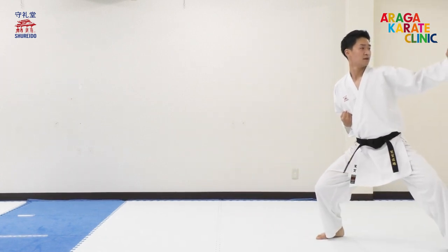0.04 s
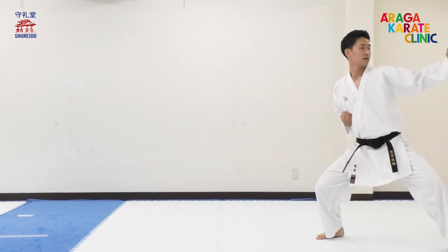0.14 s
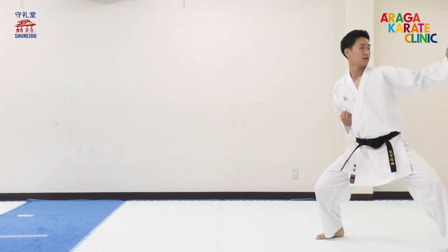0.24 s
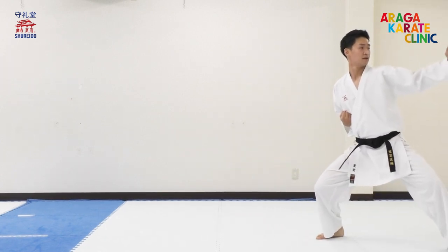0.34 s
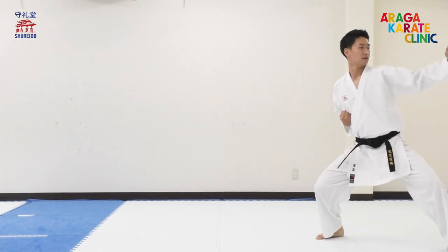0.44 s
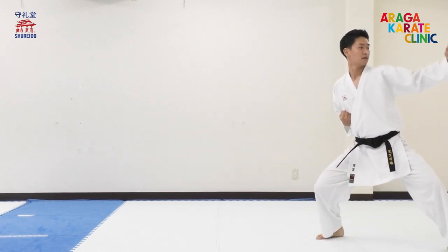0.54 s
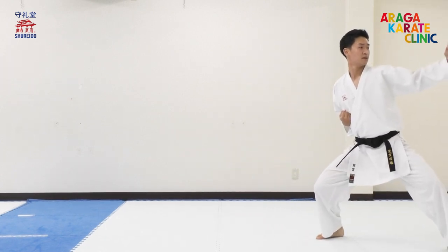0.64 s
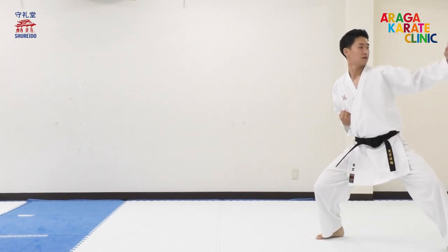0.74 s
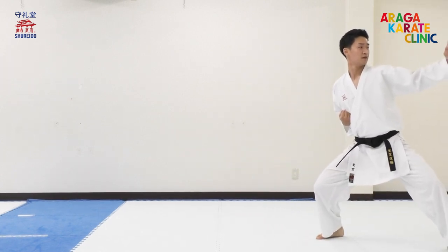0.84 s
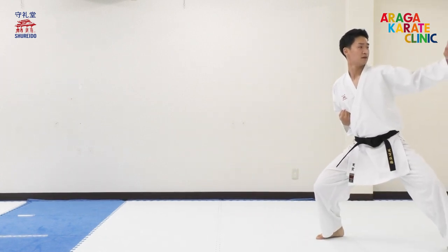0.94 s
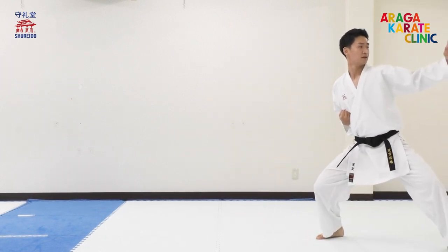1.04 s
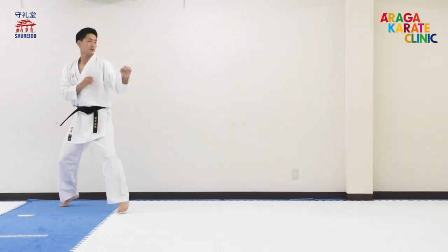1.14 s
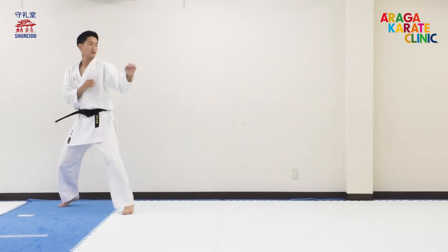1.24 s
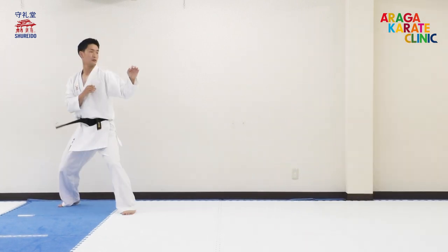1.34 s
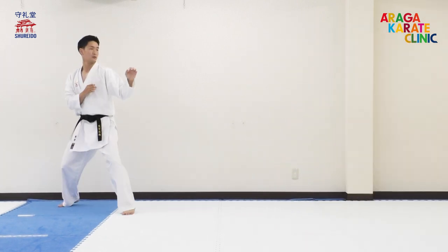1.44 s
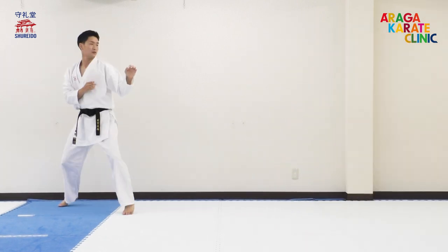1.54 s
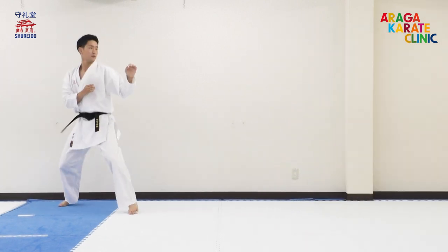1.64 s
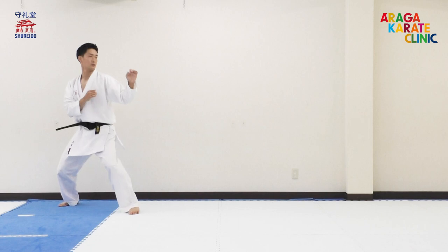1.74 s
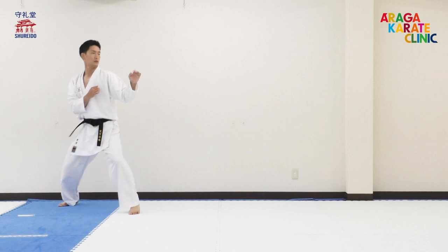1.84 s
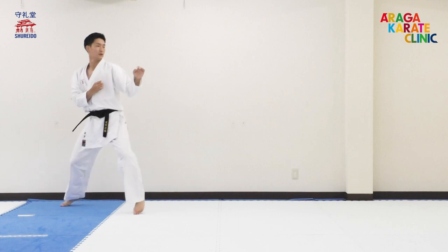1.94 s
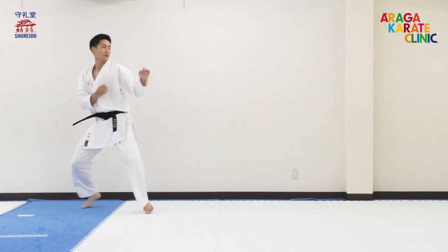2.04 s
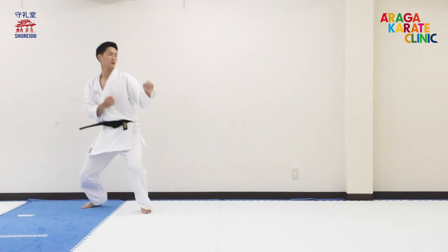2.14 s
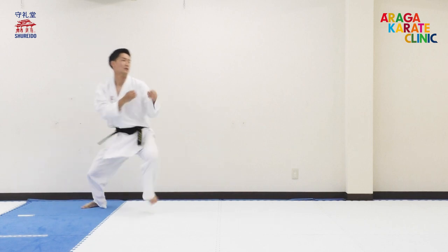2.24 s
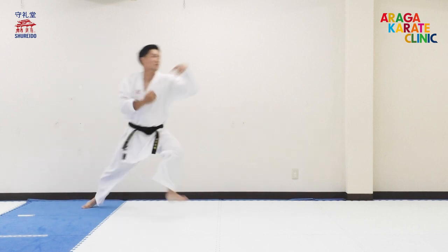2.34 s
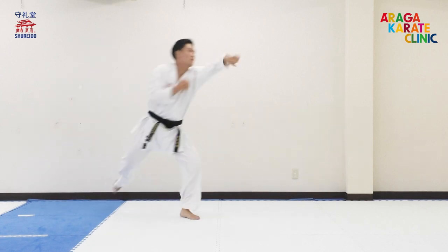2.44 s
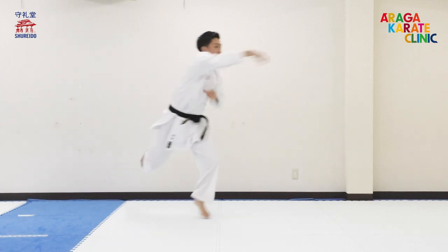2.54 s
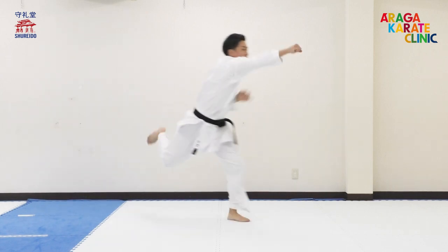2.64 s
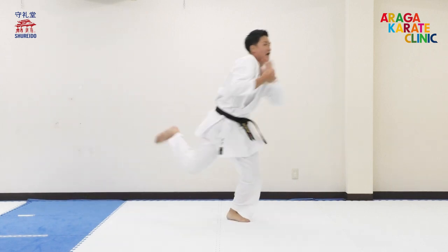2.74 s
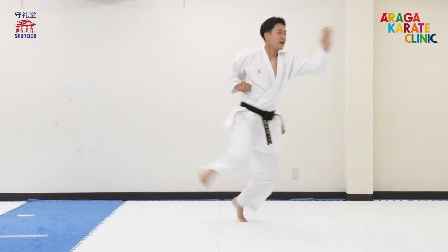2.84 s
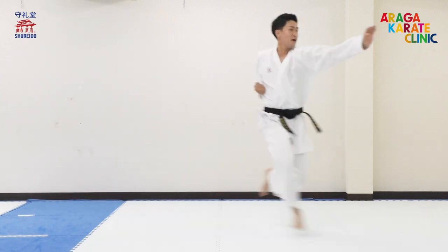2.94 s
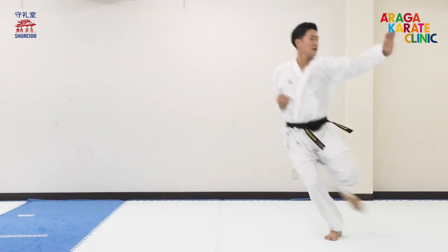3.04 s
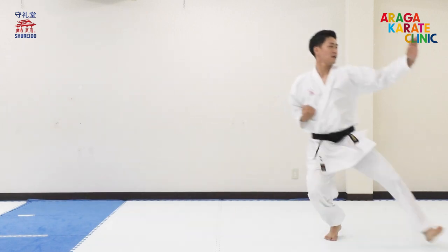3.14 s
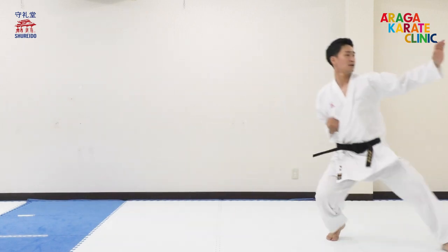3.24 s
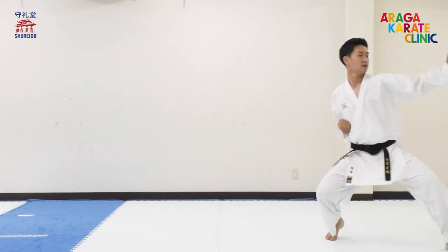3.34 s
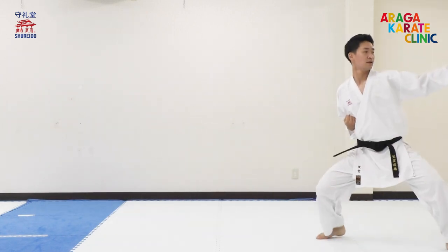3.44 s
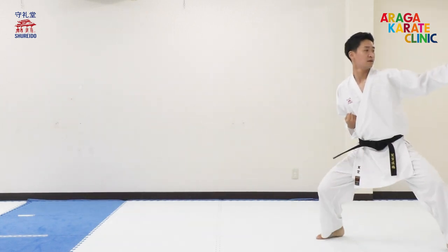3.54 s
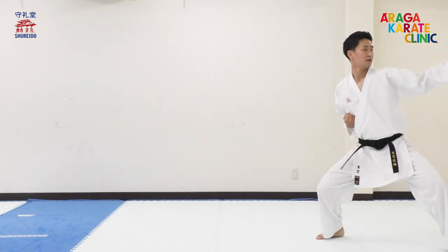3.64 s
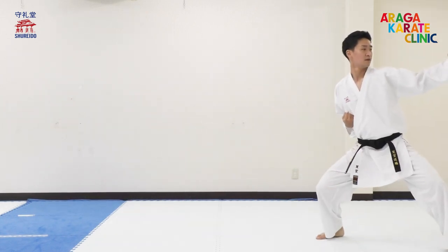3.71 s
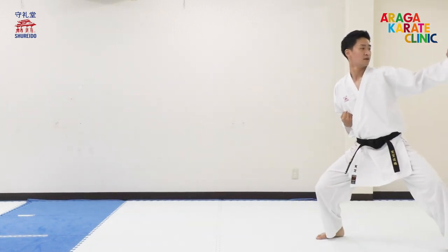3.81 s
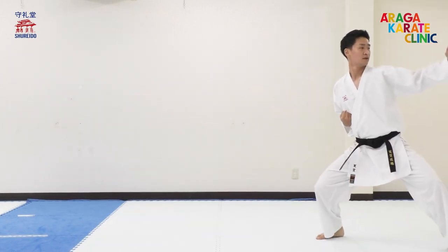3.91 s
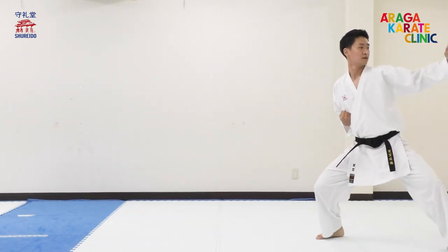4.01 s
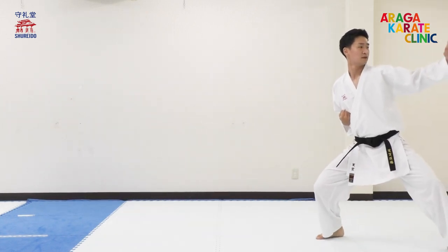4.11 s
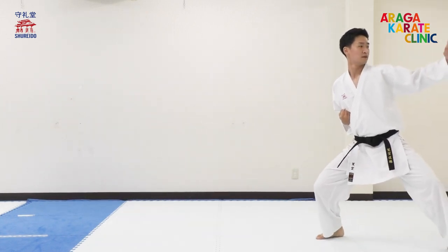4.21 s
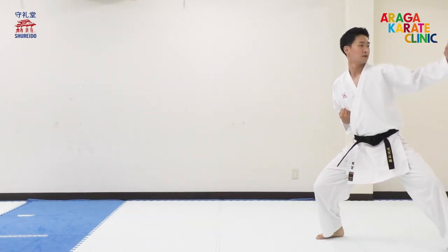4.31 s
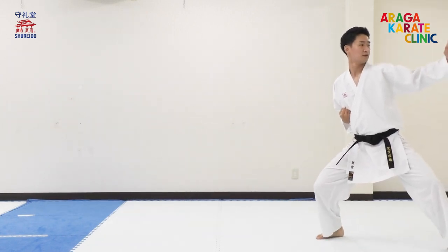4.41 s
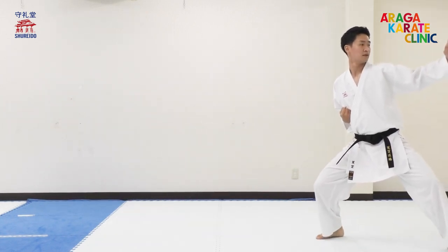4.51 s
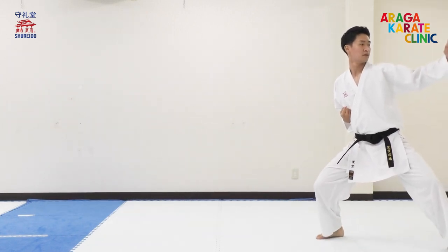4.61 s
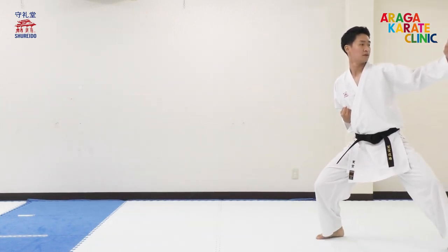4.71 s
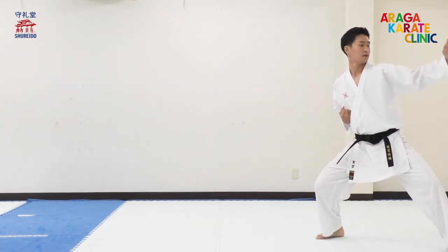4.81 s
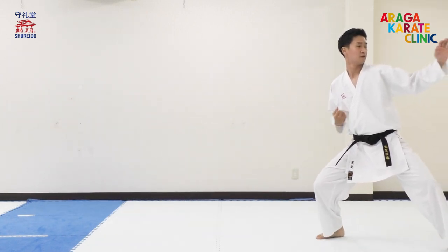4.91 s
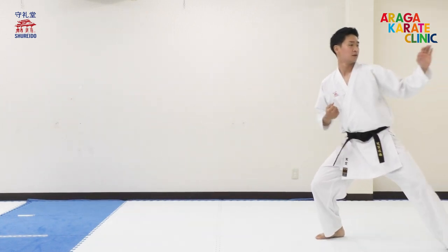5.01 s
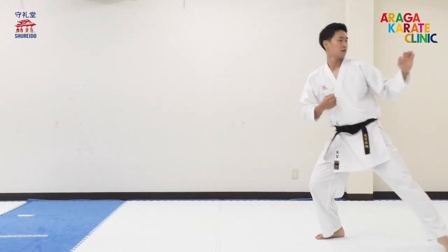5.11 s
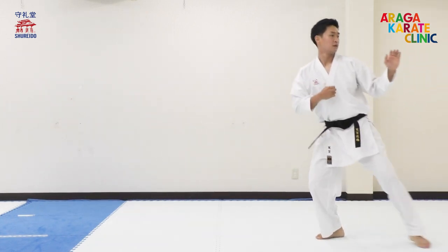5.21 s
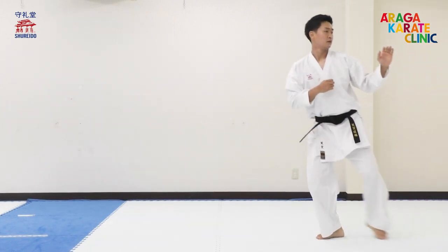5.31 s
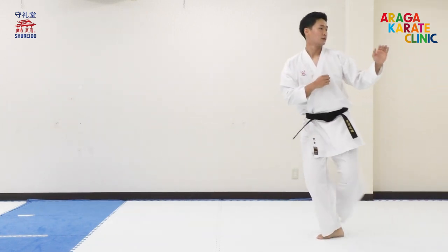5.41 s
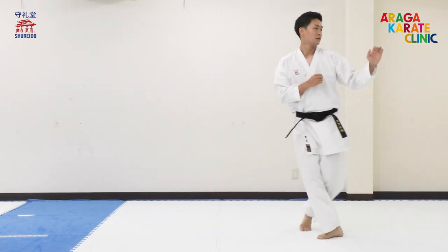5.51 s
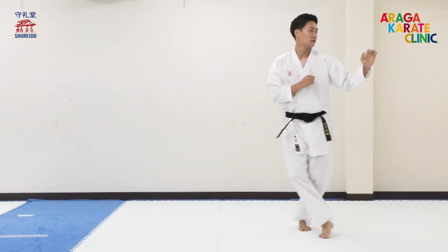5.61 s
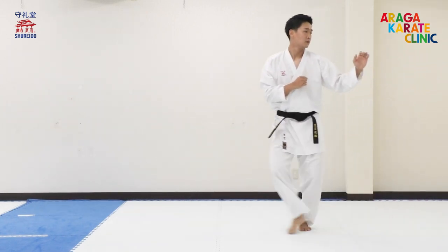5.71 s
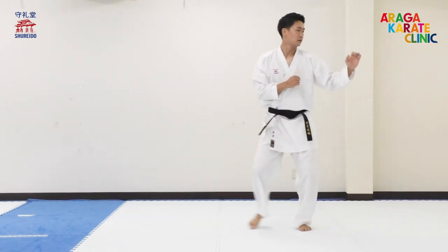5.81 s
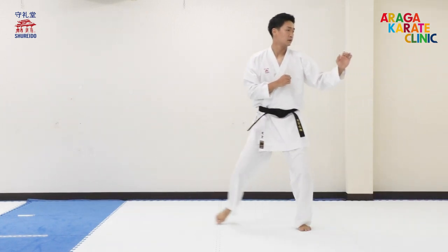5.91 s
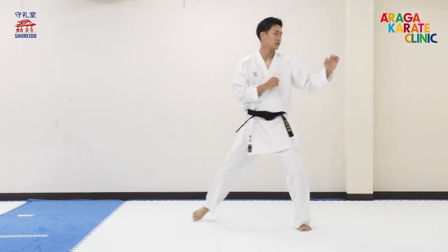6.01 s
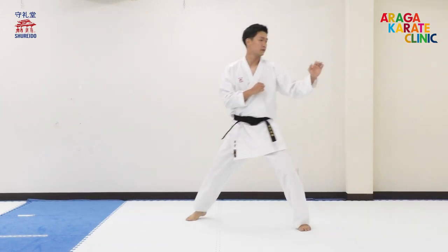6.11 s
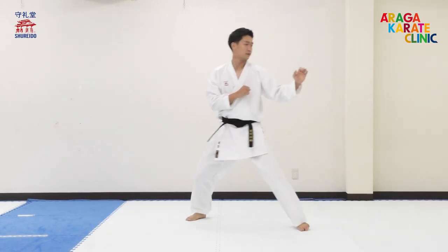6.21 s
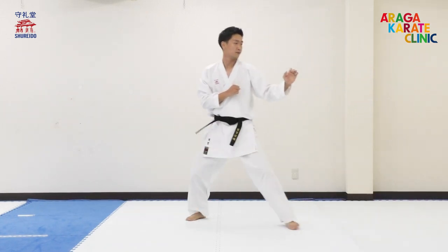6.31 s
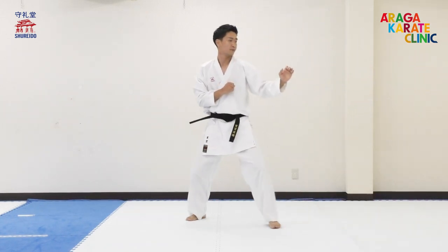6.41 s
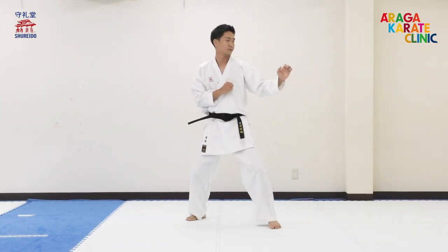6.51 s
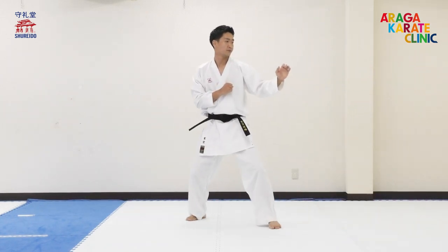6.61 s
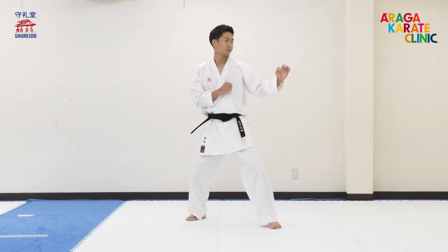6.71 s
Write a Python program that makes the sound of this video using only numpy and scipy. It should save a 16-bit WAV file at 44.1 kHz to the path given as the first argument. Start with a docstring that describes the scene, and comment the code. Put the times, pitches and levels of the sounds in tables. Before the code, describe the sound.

A heavy cotton uniform cracks and billows as a barefoot martial artist lunges twice across mats, thumping down, then quietly slides back.

```python
"""A barefoot karate fighter on foam mats in a small, bare practice room, in stereo with the moves centred.
A low rumble switches abruptly to broader, quiet room noise at 1.127 s; cloth and soles rustle and scuff.
From 2.3 s a lunge: the heavy uniform snaps and billows, a sole slaps, low thumps; a second burst from 3.06 s.
After a lull come brushes at 5 s, a long slide, a faint slap and thumps at 5.6 s and last slides from 6.1 s.
Filtered noise and grains make cloth, soles and air; decaying sines make the thumps; noise tails are the walls."""
import sys
import numpy as np
from scipy import signal
from scipy.fft import rfft, irfft
from scipy.io import wavfile
from scipy.ndimage import map_coordinates

SR = 44100
rng = np.random.default_rng(int(sys.argv[2]) if len(sys.argv) > 2 else 0)


def master_out(mix):
    """Clip the mix to full scale and print it as 16-bit PCM to the path in sys.argv[1]."""
    frames = np.transpose(np.atleast_2d(mix))
    ceiling = np.clip(frames, -1, 1)
    pcm = np.round(ceiling * 32767).astype(np.int16)
    wavfile.write(sys.argv[1], SR, pcm)


N = 297670
T = np.arange(N) / SR


def amp(db):
    """Decibels to gain."""
    return 10 ** (np.asarray(db) / 20)


def unit(x):
    """Scale to rms 1."""
    return x / np.sqrt(np.mean(x ** 2))


def add(track, s, sound):
    """Mix a sound into a track at time s."""
    i = int(s * SR)
    track[i:i + len(sound)] += sound[:N - i]


def colour(x, points, size=8192):
    """Minimum-phase filter with the given (frequency [Hz], gain [dB]) outline."""
    hz, db = np.transpose(points)
    f = np.maximum(np.arange(size // 2 + 1) * SR / size, 1)
    log_gain = np.log(amp(np.interp(np.log(f), np.log(hz), db)))
    # folding the cepstrum onto positive time makes the filter causal
    cepstrum = irfft(log_gain)
    cepstrum[1:size // 2] *= 2
    cepstrum[size // 2 + 1:] = 0
    impulse_response = irfft(np.exp(rfft(cepstrum)))
    return signal.fftconvolve(x, impulse_response)[:len(x)]


def grains(rate, spread_db):
    """Random impulses of either sign and uneven size, rate a second."""
    hit = rng.random(N) < rate / SR
    sign = np.sign(rng.standard_normal(N))
    return hit * sign * amp(spread_db * rng.standard_normal(N))


def stroke(s, rise, hold, t60):
    """Gain of one movement: it swells by 60 dB in rise seconds up to time s, holds, and dies away."""
    before = np.maximum(s - T, 0) / rise
    after = np.maximum(T - s - hold, 0) / t60
    return amp(-60 * (before + after).clip(0, 4))


def air(points, db):
    """Steady noise of the room's air; db is the rms of the part common to both channels."""
    width = [(150, -8), (1000, -2.5)]  # (frequency [Hz], side minus mid [dB])
    mid = unit(colour(rng.standard_normal(N), points))
    side = colour(unit(colour(rng.standard_normal(N), points)), width)
    return amp(db) * np.array([mid + side, mid - side])


def room_tone():
    """A low rumble switches abruptly to broader, quiet room noise."""
    # spectra of the rumble and the broader noise: (frequency [Hz], relative level [dB])
    rumble = [(15, -48), (25, -10), (64, -5.5), (121, -11), (147, -21.5), (193, -25), (457, -24.5),
              (571, -26.5), (630, -27), (826, -31), (1010, -36.5), (2440, -46.5), (4740, -39),
              (6380, -55.5), (9000, -87.5), (11700, -101), (19800, -120)]
    broad = [(15, -49.5), (25, -21.5), (91, -11.5), (116, -18.5), (144, -6), (169, -4), (399, -12),
             (523, -21.5), (648, -25), (804, -31), (970, -23.5), (1900, -26.5), (4750, -41), (6380, -46),
             (15500, -41.5)]
    rumble_db, broad_db = -62.5, -61.5
    switch_s, switch_length_s = 1.127, 0.0028
    switched = np.clip((T - switch_s) / switch_length_s, 0, 1)
    return (1 - switched) * air(rumble, rumble_db) + switched * air(broad, broad_db)


def tail(points, t60_low, t60_high):
    """Dense wall reflections as decaying noise, scaled to unit energy before colouring; treble dies first."""
    t = T[:SR // 2]
    # first reflections return after 2 ms and thicken over 5 ms
    noise = rng.standard_normal(len(t)) * np.clip((t - .002) / .005, 0, 1)
    low = signal.sosfilt(signal.butter(1, 700, fs=SR, output="sos"), noise)
    decay = low * amp(-60 * t / t60_low) + (noise - low) * amp(-60 * t / t60_high)
    return colour(decay / np.linalg.norm(decay), points)


def room(x, t60_low=0.25, t60_high=0.2):
    """Bare walls return a short tail; its bass is nearly alike left and right."""
    # colour of the reflections: (frequency [Hz], gain [dB])
    common = [(200, -7.5), (500, -5), (1400, -12), (3000, -8.5), (8000, -12.5), (15000, -19)]
    sideways = [(130, -16), (260, -16.5), (500, -9), (1200, -4.5), (3000, -4), (8000, -12.0), (14000, -8)]
    mid = signal.fftconvolve(x, tail(common, t60_low, t60_high))[:N]
    side = signal.fftconvolve(x, tail(sideways, t60_low, t60_high))[:N]
    return np.array([mid + side, mid - side])


def sway():
    """The floor booms faintly, as low noise, while the weight shifts over it."""
    # weight bearing on the floor: (time of full load [s], level [dB], hold [s])
    sways = [(2.5, -51, 0.477), (2.766, -39.5, 0.0222), (3.078, -54, 0.27)]
    # spectrum of the floor's boom: (frequency [Hz], relative level [dB])
    floor = [(15, -46), (28, -19), (40, -7), (52, -3), (68, -10), (100, -9), (200, -30), (600, -62)]
    rise_s, t60_s = 0.12, 0.25
    loads = [amp(db) * stroke(s, rise_s, hold, t60_s) for s, db, hold in sways]
    return unit(colour(rng.standard_normal(N), floor)) * np.max(loads, axis=0)


def slides():
    """Countless fibres catch and let go: a fine hiss, brighter the faster the slide."""
    # cloth and soles sliding:
    # (time of full speed [s], relative level [dB], time to swell by 60 dB [s], hold [s])
    strokes = [(1.64, -74, .15, .01), (1.974, -68.5, 0.12, .005), (2.043, -60, 0.297, 0.0105),
               (2.179, -69, 0.66, 0.0092), (2.334, -54, 0.0529, .003), (2.454, -50.5, 0.3623, 0.00248),
               (2.708, -53, 0.0664, 0.0037), (2.943, -56, 0.17, 0.0049), (3.068, -45.5, .04, 0.0222),
               (3.28, -49.5, 0.02, .04), (3.335, -47.5, 0.313, .016), (3.48, -57.5, .5, 0.0099),
               (5.255, -46.5, .26, .066), (5.659, -62.5, .4, 0.078), (5.766, -57, 0.17, 0.0095),
               (6.141, -70.5, 0.01, 0.0146), (6.394, -50, 0.2513, 0.1123)]
    # spectrum of the hiss: (frequency [Hz], relative level [dB])
    hiss_spectrum = [(1200, -37.5), (2200, -16), (2700, -9), (4200, -4.5), (5600, 0), (8700, 0),
                     (11500, -2), (13500, -11.5), (15700, -12)]
    t60_s = 0.399  # friction brings every slide to rest alike
    # above this edge the hiss grows faster with speed, by this extra power
    treble_hz, brightening = 7500, 0.3
    hiss = amp(-1.0) * unit(colour(grains(rate=14000, spread_db=2.5), hiss_spectrum))
    dull = signal.sosfiltfilt(signal.butter(2, treble_hz, fs=SR, output="sos"), hiss)
    speeds = [(amp(db), stroke(s, rise, hold, t60_s)) for s, db, rise, hold in strokes]
    body = np.max([gain * speed for gain, speed in speeds], axis=0)
    treble = np.max([gain * speed ** (1 + brightening) for gain, speed in speeds], axis=0)
    return dull * body + amp(1.0) * (hiss - dull) * treble


def scuffs():
    """Skin or cloth sticks and slips on the foam: a short, hollow burst; in some, the pitch glides up or down."""
    # soles and hems brushing the foam:
    # (time [s], level [dB], starting centre [Hz], rise [s], glide of the centre [octaves/s])
    brushes = [(1.29, -57, 850, .035, -3), (1.62, -64, 539, 0.014, 0), (1.71, -65.5, 730, 0.0284, 0),
               (1.955, -61.5, 4900, .026, 0), (2.12, -56.5, 940, 0.0187, 0), (2.13, -61.5, 420, .02, 0),
               (2.305, -57, 3100, .009, 0), (2.326, -48, 951, .015, -6), (2.35, -39, 560, .04, -3),
               (3.056, -38, 1100, .0023, -3), (3.06, -31, 422, 0.0163, 0), (3.11, -42, 1080, .014, 8),
               (3.278, -35, 720, .004, 0), (4.99, -72, 3231, 0.0215, 0), (5.088, -63.5, 5476, 0.0076, 0),
               (5.18, -67.5, 1095, 0.0386, 0), (5.76, -59.5, 5500, 0.014, 0), (5.78, -66, 900, .03, 0),
               (6.23, -61.5, 662, .022, 0)]
    # spectrum of one brush: (multiple of the centre, relative level [dB])
    brush_spectrum = [(.3, -26), (.7, -3.5), (1, 0), (1.35, -9.5), (2.2, -17), (6, -31), (15, -54)]
    gliding_s, t60_s = 0.08, 0.37
    out, t = np.zeros(N), T[:SR // 2]
    for s, db, hz, rise, glide in brushes:
        rub = unit(colour(rng.standard_normal(SR), [(k * hz, d) for k, d in brush_spectrum]))
        # reading the noise faster or slower glides its pitch
        travel = np.cumsum(2 ** (glide * np.minimum(t, gliding_s)))
        rub = map_coordinates(rub, [travel], mode="mirror")
        swell = np.minimum(t / rise, 1)
        decay = amp(db - 60 * np.maximum(t - rise, 0) / t60_s)
        add(out, s, rub * swell * decay)
    return out


def uniform():
    """Wide panels of cotton flap dully while small creases crackle."""
    # each move throws the uniform about: (time of full strength [s],
    # relative billowing level [dB], relative rustling level [dB], hold [s], t60 [s])
    throws = [(2.366, -55.5, -43, .09, .3), (2.499, -27.5, -42, 0.118, .5),
              (2.572, -20.5, -40, 0.024, 0.214), (2.67, -22.5, -37.5, 0.058, 1.2),
              (2.802, -25.5, -43.5, 0.0274, 0.464), (3.086, -30, -53.5, 0.0103, 0.324),
              (3.134, -34, -44, 0.0142, 0.776), (3.289, -28.5, -42.5, 0.1084, .48),
              (5.65, -61, -76, .16, .5)]
    # spectra of the panels and the creases: (frequency [Hz], relative level [dB])
    billow = [(50, -42), (110, -17.5), (160, -3.5), (225, 0), (300, -1.5), (440, -7.5), (600, -19),
              (850, -33.5), (2000, -64.5)]
    rustle = [(300, -21.5), (650, 3.5), (860, -11), (1300, 1.5), (1900, -4), (3200, -6), (4200, -13.5),
              (7000, -26), (14000, -52)]
    rise_s = 0.1  # time to swell by 60 dB
    flaps = unit(colour(grains(rate=1500, spread_db=1.0), billow))
    creases = unit(colour(grains(rate=2700, spread_db=0.5), rustle))
    moves = [(stroke(s, rise_s, hold, t60), billow_db, rustle_db)
             for s, billow_db, rustle_db, hold, t60 in throws]
    billowing = np.max([gain * amp(db) for gain, db, _ in moves], axis=0)
    rustling = np.max([gain * amp(db) for gain, _, db in moves], axis=0)
    return amp(-2.0) * flaps * billowing + amp(-3.5) * creases * rustling


def snaps():
    """Moving cloth: an impulse trailed by a decaying spray of noise, shaped by one spectrum."""
    # snaps of cloth, sharp or dull, and two small rustles at 1.149 and 1.236 s:
    # (time [s], peak level [dB], treble boost [dB], t60 [s])
    cloth_bursts = [(1.149, -56.5, 10, 0.275), (1.236, -53, 11, 0.26), (2.33, -27.5, 5, 0.073),
                    (2.357, -26, -0.5, 0.078), (2.4650, -15, -2, 0.011), (2.4727, -5, 3, 0.004),
                    (2.4742, -8.5, -6, 0.012), (3.057, -32, 5.5, 0.0275), (3.2527, -33, -2, 0.022),
                    (3.2785, -15.5, -8, 0.0263)]
    # spectrum of a burst before the boost: (frequency [Hz], relative level [dB])
    burst_spectrum = [(100, -17), (400, -1.5), (650, 0), (870, -5.5), (1300, 2.5), (1750, -8), (2600, -0.5),
                      (4000, -9), (6000, -14), (11500, -19.5), (15500, -30)]
    out, t = np.zeros(N), T[:SR // 5]
    for s, db, treble_db, t60 in cloth_bursts:
        burst = 0.224 * rng.standard_normal(len(t)) * amp(-60 * t / t60)
        burst[0] += 1
        # the boost sets in at 2 kHz and is full 1.3 octaves higher
        outline = [(hz, d + treble_db * np.clip(np.log2(hz / 2000) / 1.3, 0, 1)) for hz, d in burst_spectrum]
        burst = colour(burst, outline)
        add(out, s, amp(db) * burst / np.abs(burst).max())
    return out


def slaps():
    """A sole meets the mat bit by bit, as noise coloured by resonances; soft flesh cuts off the treble."""
    # soles smacking flat on the mat:
    # (time [s], level [dB], upper edge [Hz], level of the settling sole [dB])
    smacks = [(2.4717, -18, 1570, -52), (3.278, -25.5, 2033, -33), (5.587, -45.5, 2973, -50.5)]
    # resonances colouring the slap: (frequency [Hz], width [Hz], relative level [dB])
    slap_modes = [(420, 90, -4), (716, 160, -3.5), (1137, 243, -1.5), (1381, 240, 2), (1558, 160, 1),
                  (1930, 150, 2.5), (2277, 400, -1), (2796.4, 360, -1)]
    slap_t60_s, settle_rise_s, settle_t60_s = 0.027, 0.014, 0.47
    out, t = np.zeros(N), T[:SR // 2]
    for s, db, edge_hz, settle_db in smacks:
        settling = np.minimum(t / settle_rise_s, 1) * amp(settle_db - 60 * t / settle_t60_s)
        contact = rng.standard_normal(len(t)) * (amp(db - 60 * t / slap_t60_s) + settling)
        ring = np.zeros(len(t))
        for k, (hz, width, d) in enumerate(slap_modes):
            b, a = signal.iirpeak(hz, hz / width, fs=SR)
            # neighbouring modes have opposite signs
            ring += (-1) ** k * amp(d) * signal.lfilter(b, a, contact)
        ring = signal.sosfilt(signal.butter(5, edge_hz, fs=SR, output="sos"), ring)
        # the ring keeps the energy of the contact
        add(out, s, ring * np.linalg.norm(contact) / np.linalg.norm(ring))
    return out


def thuds():
    """Each low thump is a few decaying sines; the partials below the pitch ring longest, the highest dies
    soonest."""
    # low thumps of feet and of the heavy billowing cloth:
    # (time [s], peak level before the bass cut [dB], pitch of the thump [Hz])
    thumps = [(1.314, -55.5, 298), (2.136, -48, 216), (2.4676, -8, 248.4), (2.4745, -9, 291.6),
              (2.586, -21.5, 234.6), (2.692, -15.5, 258), (2.79, -16.5, 259.9), (3.079, -29, 434),
              (3.2815, -13.5, 269.3), (3.325, -19.5, 251.3), (3.378, -17.5, 195), (3.494, -24.5, 230),
              (5.596, -45.5, 282.7), (5.606, -34.5, 104), (6.244, -51, 289.6)]
    # overtones of a thump: (multiple of its pitch, relative level [dB], share of its ring time)
    thump_modes = [(.62, -9.5, 1.1), (.78, -2.5, 0.83), (1, 6.5, 0.57), (1.5, -3.5, .7), (2.3, -13, 0.38)]
    ring_cycles = 25  # sets the ring time to 60 dB down, so deep thumps last longer
    out, t = np.zeros(N), T[:SR // 2]
    for s, db, hz in thumps:
        t60 = ring_cycles / hz
        ring = np.zeros(len(t))
        for k, d, share in thump_modes:
            ring += amp(d - 60 * t / (t60 * share)) * np.sin(2 * np.pi * hz * k * t)
        ring = ring * (1 - np.exp(-t / 0.0013))  # soft onset [s]
        add(out, s, amp(db) * ring / np.abs(ring).max())
    # so small a radiating patch gives little deep bass
    radiating_hz = 145
    return signal.sosfilt(signal.butter(4, radiating_hz, "high", fs=SR, output="sos"), out)


def scene():
    """The fighter in the room, over its tone."""
    # the snaps and slaps excite the room less than the rustling does
    snap_room_db, slap_room_db = -7, -3.5
    soles, cloth = slaps(), snaps()
    motion = thuds() + scuffs() + uniform() + slides() + sway()
    walls = room(motion + amp(slap_room_db) * soles + amp(snap_room_db) * cloth)
    return motion + soles + cloth + walls + room_tone()


def record(dry):
    """Everything above 15.8 kHz is cut off steeply."""
    top_hz = 15800
    return signal.sosfilt(signal.ellip(10, .2, 80, top_hz, fs=SR, output="sos"), dry)


dry = scene()
out = record(dry)
master_out(out)
```